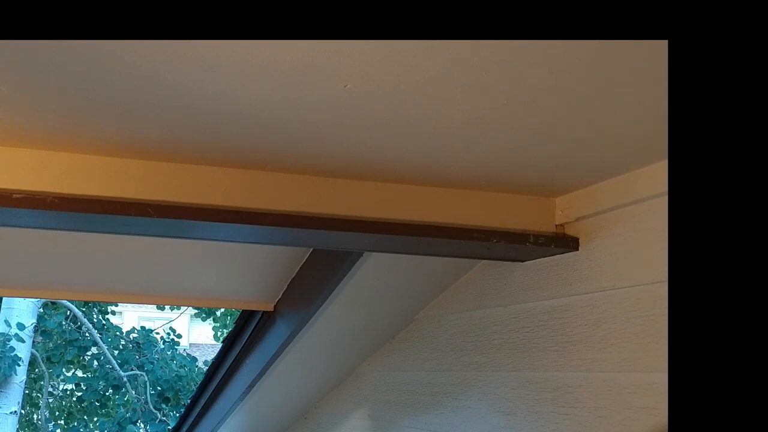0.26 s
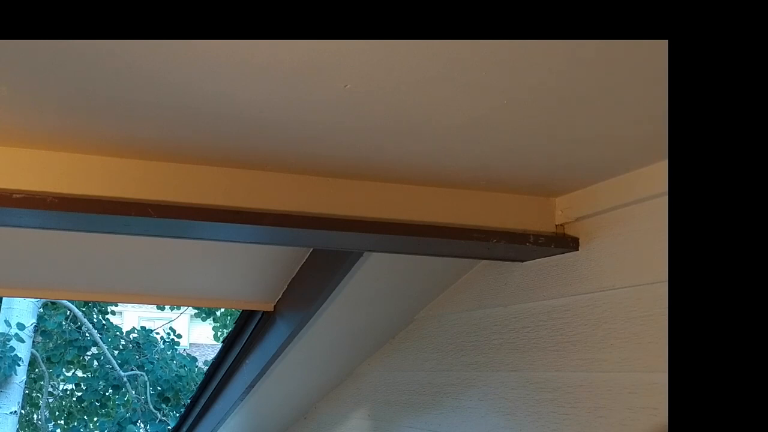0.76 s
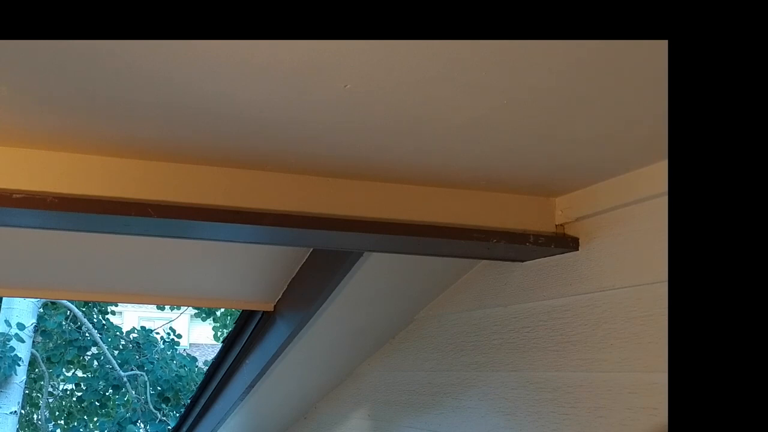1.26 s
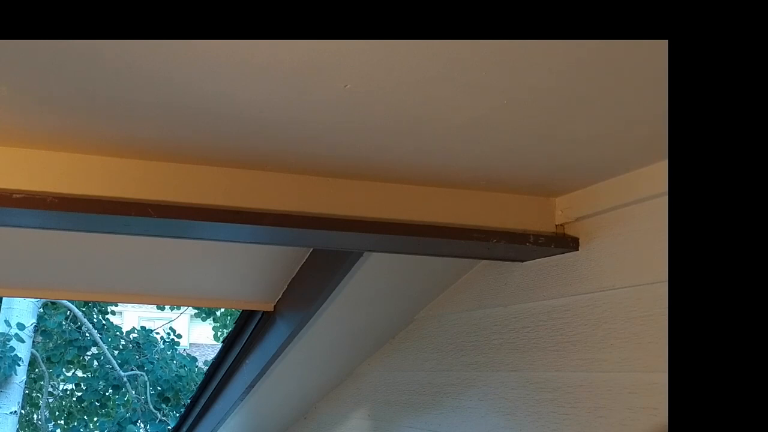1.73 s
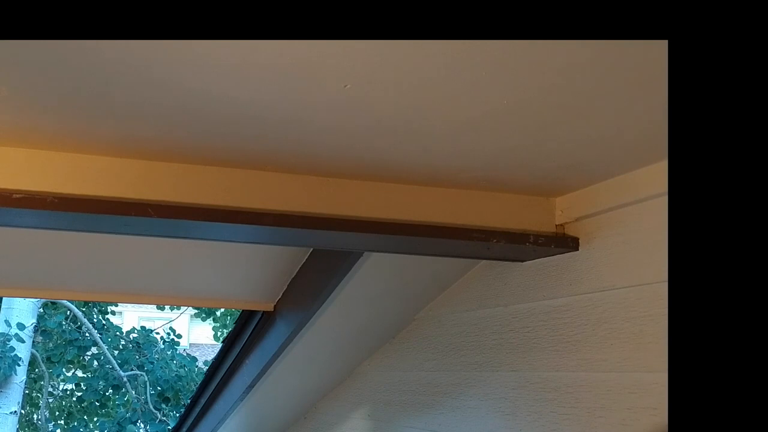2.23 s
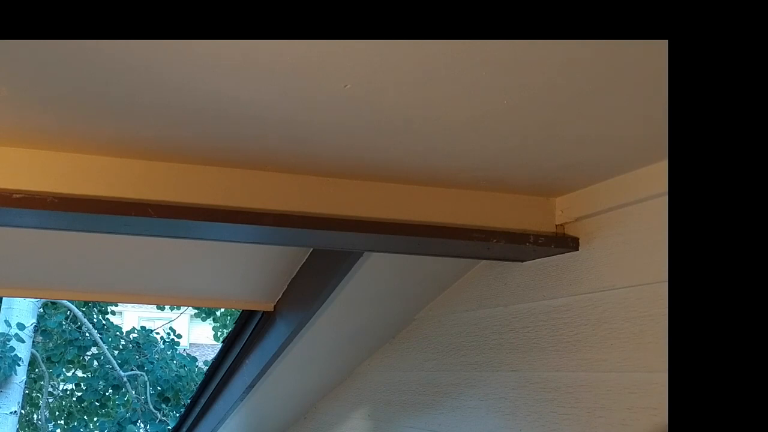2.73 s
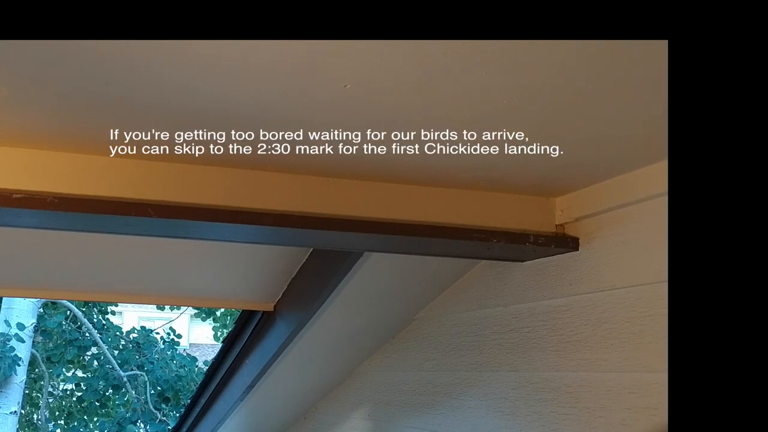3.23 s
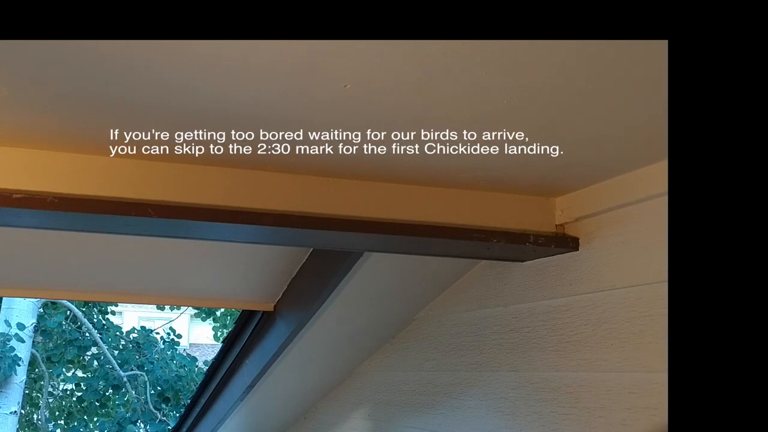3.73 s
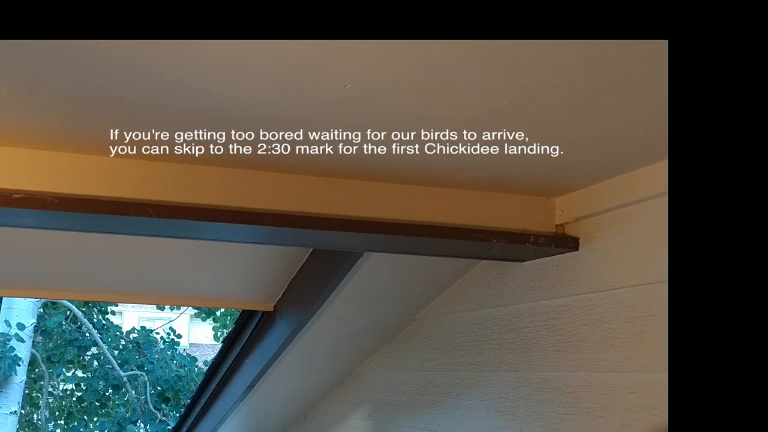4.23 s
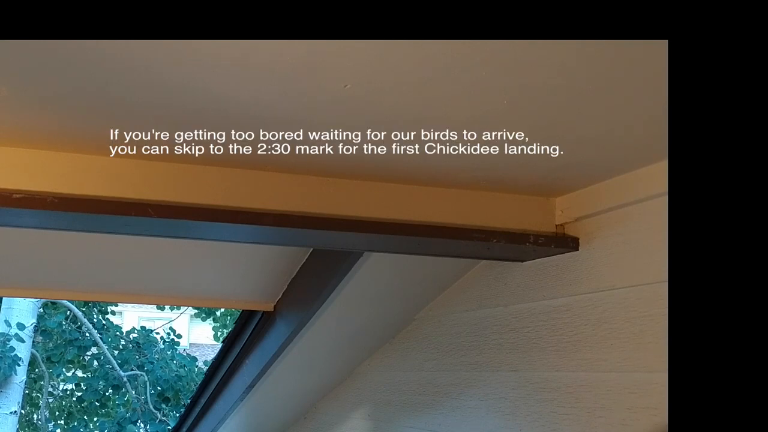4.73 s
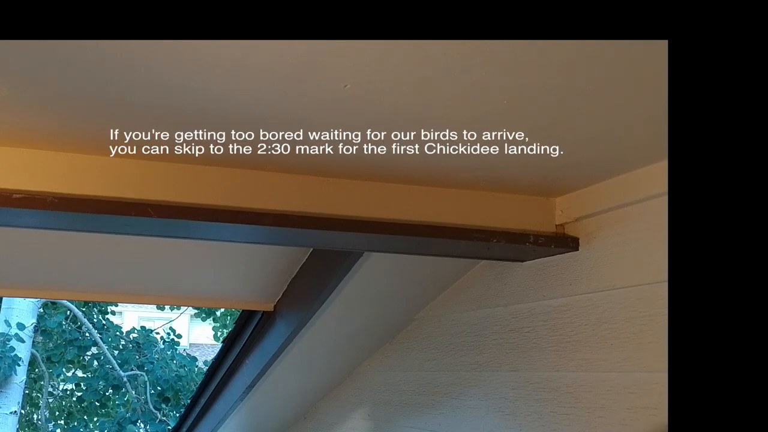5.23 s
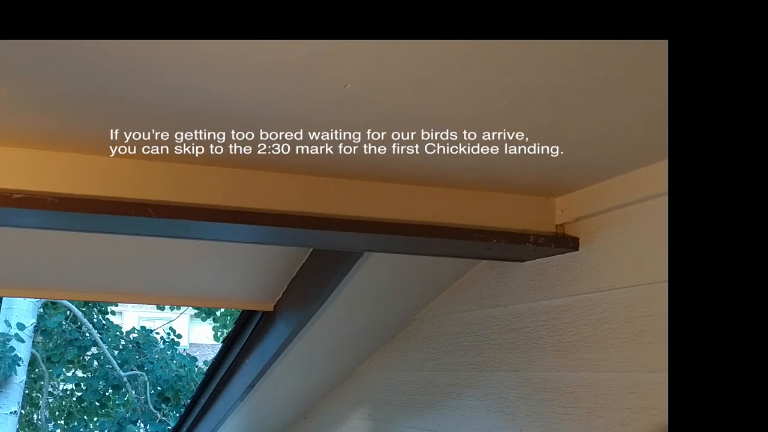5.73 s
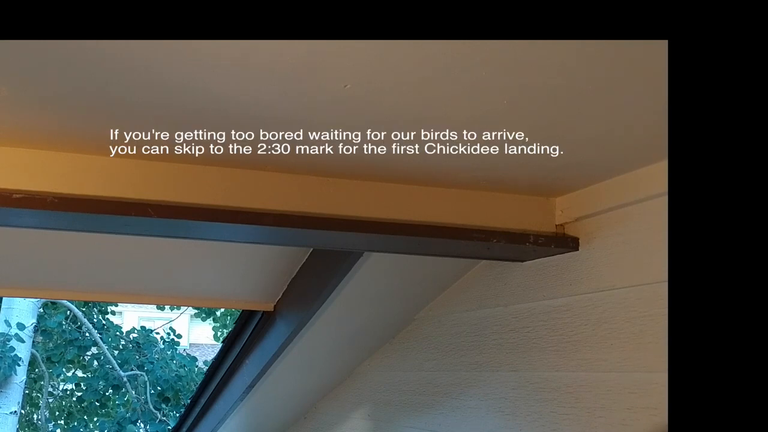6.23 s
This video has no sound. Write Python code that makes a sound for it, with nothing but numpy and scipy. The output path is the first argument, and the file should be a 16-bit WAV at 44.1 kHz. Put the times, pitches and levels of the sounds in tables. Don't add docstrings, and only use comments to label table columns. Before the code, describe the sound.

Crisp chick-a-dee calls ring out by a wooden porch, separated by quiet gaps of distant rumble, dull floor thuds and faint hollow knocks.

```python
import sys
import numpy as np
from scipy import signal
from scipy.fft import rfft, irfft, next_fast_len
from scipy.io import wavfile
from scipy.ndimage import uniform_filter1d, map_coordinates

SR = 44100
rng = np.random.default_rng(int(sys.argv[2]) if len(sys.argv) > 2 else 0)


def gain_from_db(level_db):
    decades = np.asarray(level_db, float) / 20
    return 10 ** decades


def log_audio(samples):
    frames = np.atleast_2d(samples).T
    limited = np.clip(frames, -1, 1)
    pcm = np.round(limited * 32767).astype(np.int16)
    wavfile.write(sys.argv[1], SR, pcm)


N = 285327
LEAD = SR // 10


def unit(x):
    return x / np.sqrt(np.mean(x ** 2) + 1e-20)


def along(points, hz):
    f, v = np.transpose(points)
    return np.interp(np.log(np.abs(hz) + 1), np.log(f + 1), v)


def wobble(rate_hz, count):
    knots = rng.standard_normal(int(count * rate_hz / SR) + 4)
    return map_coordinates(knots, [np.arange(count) * rate_hz / SR])


def filtered(x, response):
    m = next_fast_len(x.shape[-1] + 8192)
    spectrum = rfft(x, m) * response(np.fft.rfftfreq(m, 1 / SR))
    return irfft(spectrum, m)[..., :x.shape[-1]]


def add(mix, s, x):
    part = mix[:, LEAD + round(s * SR):][:, :x.shape[1]]
    part += x[:, :part.shape[1]]


# frequency in Hz, density in dB per Hz.
AIR_SPECTRUM = [(12, -60.5), (20, -33), (66, 1.5), (103, 1.5), (153, -6), (238, -6), (372, -13.5),
                (452, -11), (535, -18), (790, -15), (1500, -18), (2040, -21), (3550, -27), (11100, -27.5),
                (15500, -27.5)]
# frequency in Hz, left-right correlation from -1 to 1.
AIR_LIKENESS = [(60, 0.94), (150, 0.876), (380, 0.677), (950, -0.145), (2380, -0.245), (5980, 0.089),
                (15000, -0.17)]


def air():
    def angle(hz):
        return np.arccos(np.clip(along(AIR_LIKENESS, hz), -1, 1)) / 2

    def mid_side_gains(hz):
        return gain_from_db(along(AIR_SPECTRUM, hz)) * [np.cos(angle(hz)), np.sin(angle(hz))]

    mid, side = filtered(rng.standard_normal((2, N)), mid_side_gains)
    level_db = -71 + 3 + 0.213 * wobble(0.52, N)
    return gain_from_db(level_db) * unit(np.array([mid + side, mid - side]))


def engine():
    rev_s, rev_hz, rev_db = (2.9, 3.85, 4.06), (245, 290, 292), (-80, -75.5, -83)
    t = np.arange(N) / SR
    fade = np.clip(np.minimum(t - rev_s[0], rev_s[-1] - t) / 0.11, 0, 1)
    hz = np.interp(t, rev_s, rev_hz) + 3 * wobble(5, N)
    level_db = np.interp(t, rev_s, rev_db) + 2.3 * wobble(5.39, N)
    return fade * gain_from_db(level_db) * np.sin(2 * np.pi * np.cumsum(hz) / SR)


def hollow_drone():
    pass_s, pass_width_s, pass_db, drone_db = 6.18, 0.26, -70.5, -92.5
    hollow = filtered(rng.standard_normal((2, N)), lambda hz: 1 / (1 + ((hz - 740) / 130) ** 4))
    near = gain_from_db(pass_db) / np.hypot(1, (np.arange(N) / SR - pass_s) / pass_width_s)
    passing = near * gain_from_db(1.5 * wobble(9, N))
    steady = gain_from_db(drone_db + 3 * wobble(3.2, N))
    return (passing + steady) * unit(hollow)


def struck(db, hz, attack_s, t60_s, unsteady):
    t = np.arange(SR // 4) / SR
    phase = 2 * np.pi * np.cumsum(hz * (1 + unsteady * wobble(30, len(t)))) / SR
    return gain_from_db(db - 60 * t / t60_s) * (1 - np.exp(-t / attack_s)) * np.sin(phase)


# start in seconds, peak level in dB, pitch in Hz.
FLOOR_THUDS = [(0.72, -56.5, 82.47), (1.459, -47.5, 90.1), (2.266, -45, 82.5), (2.541, -47.5, 105),
               (2.854, -51, 82), (3.075, -53, 84.4), (3.312, -52.5, 128.3), (3.313, -47.5, 74),
               (3.806, -54.5, 80.4), (4.741, -70, 96.85), (4.922, -52, 87), (5.511, -51.5, 81),
               (5.919, -48, 84.96), (6.1, -54, 90)]


def thuds():
    mix = np.zeros((2, N + LEAD))
    for s, db, hz in FLOOR_THUDS:
        blow = struck(db + 1.5, hz, attack_s=0.01, t60_s=0.17, unsteady=0.12)
        add(mix, s, blow * gain_from_db([[.6], [-.6]]))
    return mix[:, LEAD:]


# start in seconds, peak level in dB, pitch in Hz, left minus right in dB.
HOLLOW_KNOCKS = [(2.714, -69, 906, -8), (3.551, -80, 747, -0.5), (3.81, -70.5, 715, 2),
                 (4.05, -79, 773, -1), (4.156, -73.5, 665, 14.5), (4.319, -75.5, 803, 13.5),
                 (4.549, -83, 954, -19), (4.616, -79, 755, -0.5), (4.865, -69, 680, 13),
                 (4.914, -68.5, 672, -10.5), (5.077, -74, 767, 5), (5.164, -69, 835, -14.5),
                 (5.234, -73.5, 800, 20), (5.37, -72, 943, -17.5), (5.486, -66.5, 688, -8),
                 (5.702, -70, 707, 1), (5.785, -65, 782, -8), (5.926, -68.5, 567, -19),
                 (5.996, -78.5, 720, -4), (6.089, -67, 773, 12), (6.127, -64, 738.5, -8),
                 (6.189, -68.5, 749, 19), (6.305, -73, 750, 3), (6.41, -71, 730, 5)]


def knocks():
    mix = np.zeros((2, N + LEAD))
    for s, db, hz, pan_db in HOLLOW_KNOCKS:
        blow = struck(db + 7, hz, attack_s=0.0066, t60_s=0.097, unsteady=0.0726)
        add(mix, s, blow * gain_from_db([[pan_db / 2], [-pan_db / 2]]))
    return mix[:, LEAD:]


# frequency in Hz, t60 in seconds.
PORCH_T60 = [(1500, 0.2975), (3300, .4), (4200, 0.24), (5500, 0.41), (7500, 0.2), (13000, 0.19)]
# frequency in Hz, left minus right in dB.
CAMERA_SHADOW = [(1000, 38), (3000, -6.5), (6000, 0), (9000, -4.5), (13000, -12.5)]


def porch(x, wet_db, direct_db):
    hz, t, z = signal.stft(rng.standard_normal((2, SR // 2)), SR, nperseg=256)
    decay_db = -60 * t / along(PORCH_T60, hz)[:, None]
    tail = signal.istft(z * gain_from_db(decay_db), SR, nperseg=256)[1]
    tail = gain_from_db(wet_db) * tail / np.linalg.norm(tail[0])
    tail[:, 0] = gain_from_db(direct_db)
    both = signal.fftconvolve(x[None], tail, axes=1)
    side = np.array([[.5], [-.5]])
    delay_s = (side + .5) * 0.0004032
    return filtered(both, lambda f: gain_from_db(side * along(CAMERA_SHADOW, f)) * np.exp(-2j * np.pi * f * delay_s))


def syrinx(sum_hz, one_hz, throat, falls_db, sum_db, breath, tilt_db, fade_db):
    m, n = np.mgrid[-4:7, -4:7].reshape(2, -1, 1)
    hz = m * one_hz + n * (sum_hz - one_hz)
    level_db = sum_db * (m == n) - falls_db[0] * abs(m - 1) - falls_db[1] * abs(n - 1)
    level_db = level_db - falls_db[2] * ((m < 1) | (m > 1) & (n < 1))
    knots = rng.standard_normal((len(m), 8))
    at = np.linspace(0, 7, len(sum_hz))
    level_db = level_db + fade_db * np.array([np.interp(at, np.arange(8), row) for row in knots])
    heard = (hz > 0) & (hz < SR / 2)
    phase = 2 * np.pi * np.cumsum(hz, axis=1) / SR + rng.uniform(0, 2 * np.pi, m.shape)
    tones = np.sum(heard * gain_from_db(level_db) * np.sin(phase), axis=0)
    rough = tones * (1 + breath * wobble(1800, len(sum_hz)))
    return unit(filtered(rough, lambda f: gain_from_db(along(throat, f) + tilt_db * np.log2(f / 3300 + 0.12))))


# start in seconds, length in seconds, held sum tone in Hz,
# level in dB, harshness from 0 to 1.
CHICK_NOTES = [(-.05, 0.0502, 5760, -47, 0.72), (0.024, 0.043, 4689, -40, .6),
               (0.846, .062, 7000, -30, 0.2), (0.959, 0.04, 5918, -35, 0.61),
               (1.046, 0.032, 4818, -39.5, 0.8), (3.251, 0.042, 6220, -35, .65),
               (3.324, 0.041, 5290, -39, 0.7), (3.408, .045, 4495, -42, 0.6),
               (6.036, 0.047, 6402, -32, 0.62), (6.116, 0.044, 5439, -36.5, 0.64),
               (6.187, 0.043, 4317, -40, .45)]
# frequency in Hz, gain in dB.
CHICK_GAINS = [(1000, -53.5), (1500, -45), (1800, -28.5), (2350, -24), (3100, -21), (3500, -4.5),
               (6500, 3.5), (7700, -4.5), (8400, -6), (8800, -26), (10500, -16.5), (11700, -11.5),
               (13600, -4), (15300, -16)]


def chicks():
    mix = np.zeros((2, N + LEAD))
    for s, length_s, held_hz, db, harsh in CHICK_NOTES:
        u = np.linspace(0, 1, round(length_s * SR))
        rise = (.17 + .16 * harsh) * np.exp(-u / (.52 - .45 * harsh))
        drop = 0.42 * np.exp((u - 1) / .09)
        sum_hz = held_hz * (1 - rise - drop) + 300 * harsh * wobble(500, len(u))
        one_hz = 1800 + 0.16 * (6700 - held_hz) + 500 * harsh * wobble(400, len(u))
        swell = np.clip(u / 0.42, 0, 1) ** 2 * np.clip((1 - u) / 0.22, 0, 1)
        shut = 1 / (1 + np.exp((held_hz - 4670) / 80))
        tilt_db = 2.2 - 1.5 * (1 - harsh) ** 2 - 8 * shut
        falls_db = (8 - 6 * harsh, 8.5, 16 - 24 * harsh)
        note = syrinx(sum_hz, one_hz, CHICK_GAINS, falls_db, sum_db=8.5 - 2.5 * harsh,
                      breath=1.05 * harsh, tilt_db=tilt_db, fade_db=3.0)
        add(mix, s, porch(gain_from_db(db) * swell * note, wet_db=3.0, direct_db=0.5))
    return mix[:, LEAD:]


# start in seconds, length in seconds, level in dB,
# sum tone at onset in Hz, gap between the voices in Hz.
DEE_NOTES = [
    (1.122, .215, -52.5, 3820, 285),
    (1.368, .205, -56.5, 3198, 267.5),
    (1.608, .2, -55.5, 3157, 255.2),
    (1.856, .208, -54, 3178, 296.7),
    (3.49, .212, -49.5, 3442, 290),
    (3.742, .21, -51, 3228, 270.5),
    (4.005, .205, -51, 3255, 266.6),
    (4.254, .2, -52, 3222, 262.5),
    (4.517, .218, -51.5, 3223, 255.7),
    (6.279, .22, -50.5, 3410, 262.6),
]
# frequency in Hz, gain in dB.
DEE_GAINS = [(1200, -79), (1780, -32.5), (2400, -23), (2800, -2), (3300, 3.5), (3800, 5.5), (4150, 6.5),
             (4500, -8.5), (4900, -8.5), (5250, -23), (6100, -30), (6600, -28.5), (7300, -33.5),
             (15000, -34)]


def dees():
    held_hz, settle_share, sag_hz = 3331, .26, 110
    attack_s, release_s, hoarse = 0.028, .03, .42
    mix = np.zeros((2, N + LEAD))
    for s, length_s, db, onset_hz, gap_hz in DEE_NOTES:
        t = np.arange(0, length_s, 1 / SR)
        u = t / length_s
        push_khz = (onset_hz - held_hz) / 1e3
        sum_hz = held_hz + (onset_hz - held_hz) * np.exp(-u / settle_share) - sag_hz * u ** 2
        sum_hz = sum_hz + 40 * hoarse * wobble(61.9, len(t)) + 28 * wobble(18, len(t))
        gap_hz = gap_hz + 45 * hoarse * wobble(49.57, len(t)) + 14 * wobble(11, len(t))
        edges = np.clip(np.minimum(t / attack_s, (length_s - t) / release_s), 0, 1)
        level_db = db + 20 * push_khz * (.5 - u) + 1.3 * wobble(30, len(t))
        tilt_db = 1.5 + .4 * (db + 52) + 9 * push_khz
        sum_db = 3.5 + .9 * (db + 51)
        note = syrinx(sum_hz, (sum_hz + gap_hz) / 2, DEE_GAINS, (2.2, 2.4, .3), sum_db,
                      breath=hoarse, tilt_db=tilt_db, fade_db=2.5)
        add(mix, s, porch(gain_from_db(level_db) * edges * note, wet_db=.5, direct_db=2.5))
    return mix[:, LEAD:]


def scene():
    return air() + engine() + hollow_drone() + thuds() + knocks() + chicks() + dees()


def masked(x, margin_db, up_db, down_db):
    hz, _, z = signal.stft(x, SR, nperseg=2048)
    level_db = 10 * np.log10(uniform_filter1d(abs(z) ** 2, size=16, axis=1)[:, ::16] + 1e-20)
    bark = 26.8 * hz[::16] / (1960 + hz[::16])
    step = bark[:, None] - bark
    spread_db = np.where(step > 0, up_db * step, -down_db * step)
    mask_db = np.max(level_db[:, None] - spread_db[None, :, :, None], axis=2) - margin_db
    hidden = np.repeat(mask_db > level_db, 16, axis=1)[:, :len(hz)]
    return signal.istft(z * ~hidden, SR, nperseg=2048)[1][:, :N]


def band_limit(x):
    return signal.sosfilt(signal.butter(12, 15690, fs=SR, output="sos"), x)


def record(dry):
    limited = filtered(dry, lambda hz: hz < 15700)
    kept = masked(limited, margin_db=12.5, up_db=7.8, down_db=28)
    return band_limit(kept)


dry = scene()
out = record(dry)
log_audio(out)
```